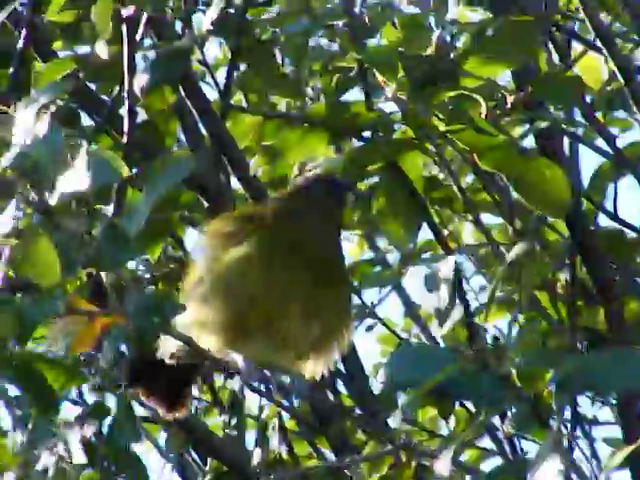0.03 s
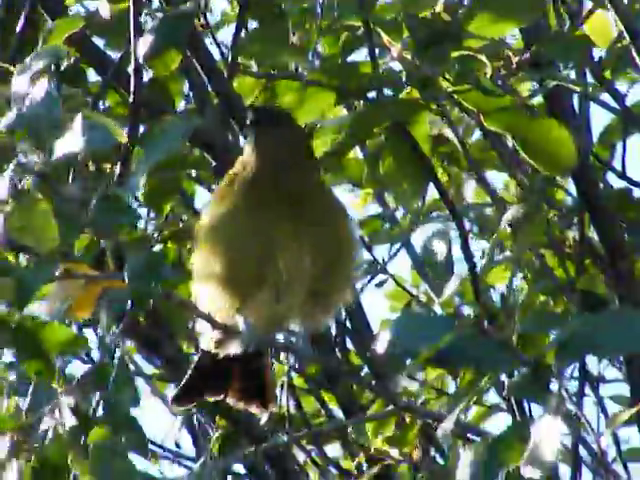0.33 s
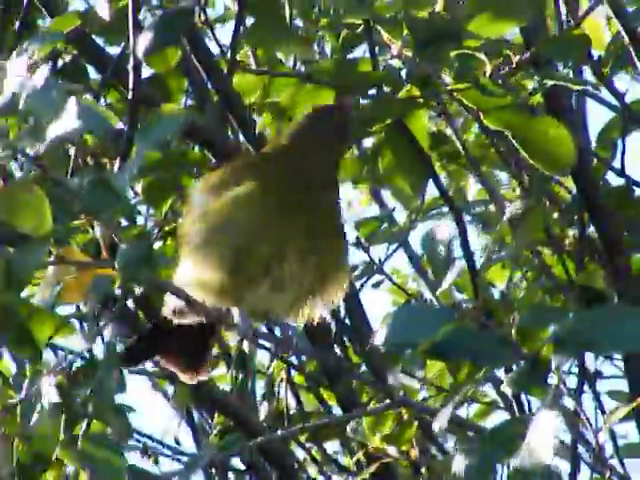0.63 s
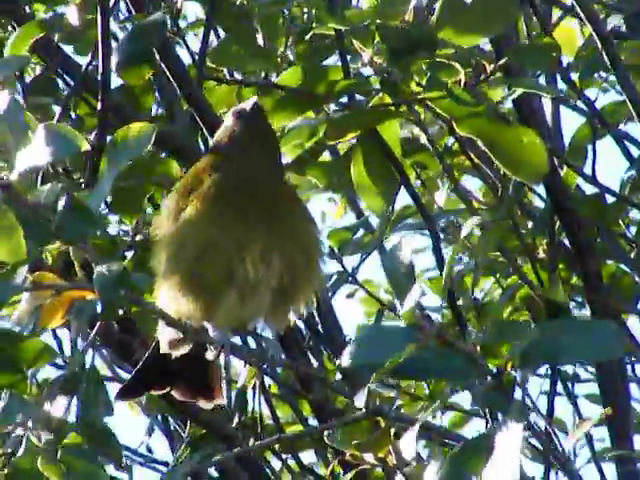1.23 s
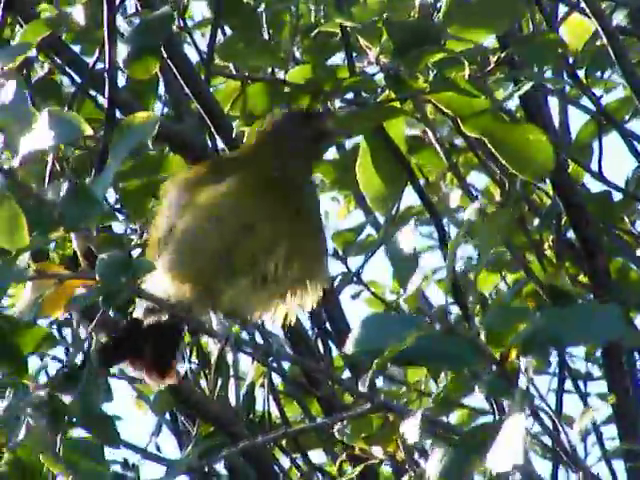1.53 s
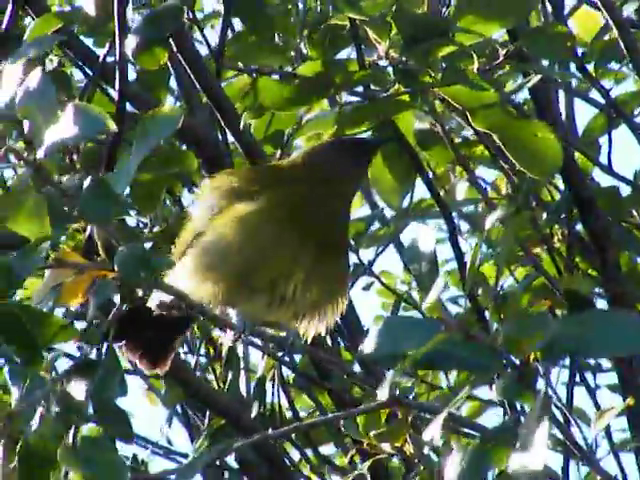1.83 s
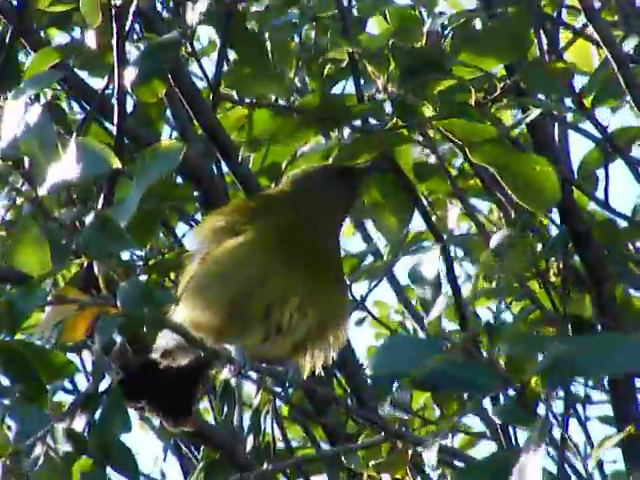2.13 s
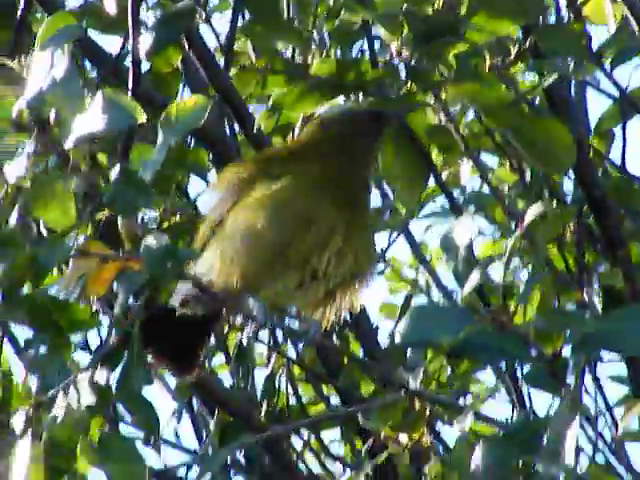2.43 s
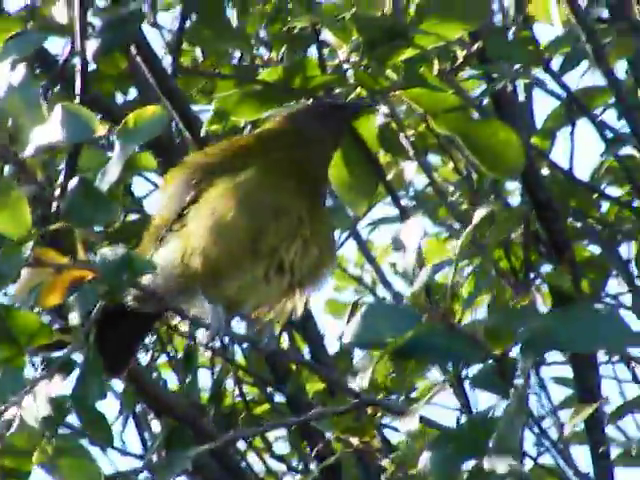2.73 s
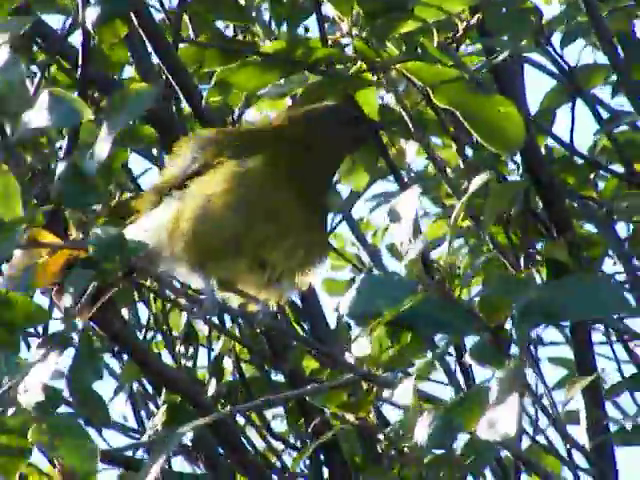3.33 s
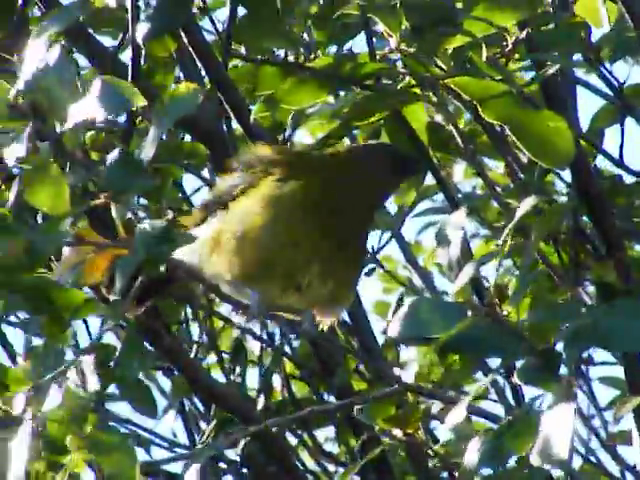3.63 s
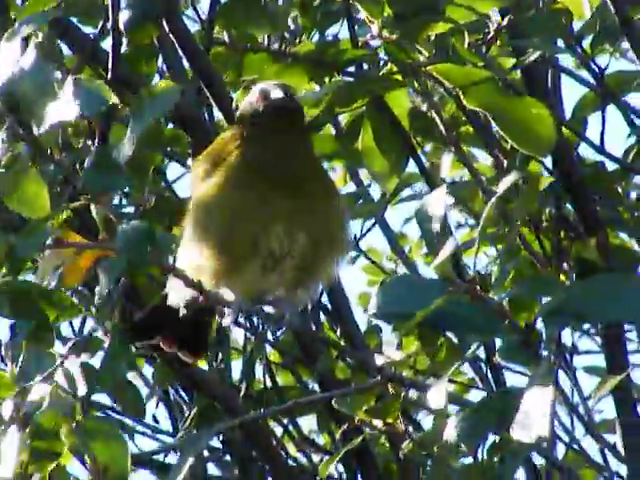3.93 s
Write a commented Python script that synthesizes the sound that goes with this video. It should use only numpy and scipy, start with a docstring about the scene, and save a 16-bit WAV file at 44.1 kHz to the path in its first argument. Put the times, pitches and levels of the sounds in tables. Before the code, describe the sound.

Close to the microphone, a songbird sings sparse notes among trees: a soft hoot, two brief rasps and dry clicks, ending with two loud downward whistles. A faint low rumble and distant hum continue underneath.

```python
"""A songbird sings close by in a leafy tree, over a faint outdoor rumble and hum. It opens with the faint
fading ring of an earlier note near 1650 Hz, one soft gliding hoot and dry clicks, probably of the bill.
Near 0.9 s and 1.8 s the two sides of its syrinx beat in harsh notes, each trailed by a hoot; clicks follow
at 1.1 s and 2.8 s. After a faint glide, two loud whistles fall at 3.3 s and 3.7 s, just clipping, each
trailed by a hoot. Throughout, trunks and leaves scatter the song, and all is dull above 6 kHz."""
import sys
import numpy as np
from scipy import signal
from scipy.fft import rfft, irfft
from scipy.io import wavfile
from scipy.ndimage import uniform_filter1d, minimum_filter1d

SR = 44100
rng = np.random.default_rng(int(sys.argv[2]) if len(sys.argv) > 2 else 0)


def output_pcm(signal):
    """Save a mono or channel-first signal as 16-bit PCM at the path in sys.argv[1].

    Samples are clipped to [-1, 1] before scaling.
    """
    pcm = np.clip(np.atleast_2d(signal).T, -1, 1) * 32767
    wavfile.write(sys.argv[1], SR, np.round(pcm).astype(np.int16))


N = 176400

# falling whistles (start [s], length [s], attack [s], mid-fall [s], fall time constant [s], level [dB])
WHISTLE_NOTES = [(3.302, 0.0926, 0.052, 3.347, 0.01143, -2.5), (3.732, 0.075, 0.028, 3.766, .0090, -3)]
# harsh notes (start [s], length [s], attack [s], low voice [Hz], high voice [Hz], level [dB])
RASP_NOTES = [(0.866, 0.081, 0.03, 1349, 1647, 2), (1.826, .082, 0.043, 1326, 1618, 2.5)]
# combination tones of the syrinx (multiple of low voice [-], multiple of high voice [-])
COMBINATION_ORDERS = [(1, 0), (0, 1), (-1, 2), (3, -1), (2, 0), (1, 1), (0, 2), (-1, 3), (4, -1), (3, 0),
                      (2, 1), (1, 2), (0, 3), (-1, 4), (3, 1)]
# strengths of those tones, a row per harsh note and a column per tone (relative level [dB])
COMBINATION_DB = [(-39, -30.5, -33, -36.5, -32.5, -22.5, -30.5, -41, -38.5, -28, -36, -33.5, -33.5, -34.5, -58),
                  (-38, -36.5, -34.5, -36, -38.5, -26, -24.5, -31, -47, -32.5, -29.5, -35.5, -37, -33, -66)]
# breath spectrum of the harsh notes (frequency [Hz], relative level [dB])
BREATH_SPECTRUM = [(900, -38), (1300, -13.5), (2000, -6.5), (2370, -11.5), (2800, -13), (3200, 3.5),
                   (3700, 1.5), (4200, 6), (4700, -4), (5300, -4.5), (6000, -9)]
# soft glides: first an earlier note's fading ring, then low hoots and one high glide (start [s],
# length [s], first pitch [Hz], final pitch [Hz], settling time [s], level [dB], roughness [share of pitch])
SOFT_GLIDES = [(.005, 0.16, 1704, 1602, 0.063, -42.5, 0.046), (0.073, 0.18, 1020, 901, 0.028, -27, 0.0048),
               (0.916, 0.082, 956, 761, .03, -38, .05), (1.888, 0.056, 950, 807, 0.024, -33.5, 0.044),
               (3.181, 0.16, 4710, 1790, .065, -40.5, 0.034), (3.385, 0.1, 994, 902, 0.032, -29, .007),
               (3.799, 0.1, 900, 746, 0.028, -37.5, .04)]
# dry clicks (time [s], level [dB], resonance [Hz], width [Hz], relative knock [dB], relative ring [dB])
BILL_CLICKS = [(0.0708, -19, 1750, 450, -20.5, -10), (.079, -29, 1750, 450, -25.5, 0),
               (1.114, -41, 4300, 1500, -25, -22), (1.122, -12, 3420, 900, -1, -36),
               (1.126, -19, 2020, 700, 0, -34), (2.784, -30, 3600, 1800, -11, -34),
               (2.7871, -17, 3360, 1380, 0.5, -38.5), (2.791, -21, 2030, 1200, -8, -31)]
# reflections from ground and trunks (delay [s], gain [dB])
REFLECTIONS = [(.0125, -18.5), (0.025, -19), (0.0491, -12.5), (.066, -22.5), (.097, -22), (.175, -31.5)]
# spectrum of the outdoor air (frequency [Hz], relative level [dB])
AIR_SPECTRUM = [(13, -30.5), (22, -1), (40, -4), (60, -6), (100, -8.5), (160, -8), (260, -10.5), (380, -10),
                (550, -14.5), (880, -15.5), (1230, -23.5), (2000, -23.5), (3400, -27.5), (5500, -32.5),
                (7000, -63.5)]
# slow swell of the outdoor air (time [s], relative level [dB])
AIR_SWELL = [(0, 1), (1, -.5), (2, -1), (2.8, -1), (3.2, 1.5), (4, -0.5)]
# spectrum of the low buffeting (frequency [Hz], relative level [dB])
BUFFET_SPECTRUM = [(15, -0.5), (40, 0), (80, 4), (160, -23.5), (600, -69)]
# course of the low buffeting (time [s], level [dB])
BUFFET_LEVELS = [(0, -56), (.9, -52.5), (1.3, -41), (1.9, -49.5), (2.6, -56), (3.2, -40), (3.6, -41),
                 (4, -36)]
# tones of the distant hum (frequency [Hz], first level [dB], last level [dB])
HUM_TONES = [(75.6, -50, -41), (118.9, -46, -44), (301, -54.5, -48)]

WHISTLE_TOP_HZ, WHISTLE_END_HZ, WHISTLE_RELEASE_S, WHISTLE_JITTER = 2378, 1502, .018, .005
LOW_END_DB, OVERTONE_DB, OVERTONE_FLUTTER = -15, -32.5, .91
RASP_RELEASE_S, RASP_ARCH, RASP_JITTER, RASP_FLUTTER, BREATH_DB = .032, .011, .0058, .17, -20.5
THROAT_LAG_S_PER_HZ = 4e-7  # higher tones leave the throat a little later
GLIDE_ATTACK_SHARE, GLIDE_RELEASE_S = .37, .028
CLICK_TIME_SCALE_S, KNOCK_HZ, BILL_RING_HZ = .0012, 342, 5000
NEAR_DB, NEAR_T60_S, WOOD_DB, WOOD_T60_S = -12.5, .08, -14.5, .48
SHEEN_HZ, SHEEN_WIDTH_HZ, SHEEN_DB = 4870, 720, -.5
RASP_WET_DB, WHISTLE_WET_DB, GLIDE_WET_DB, CLICK_WET_DB = -1.5, 0, -3, -17.5  # gains into the scattering
AIR_DB, AIR_DRIFT_DB, AIR_DRIFT_HZ = -37, .5, 1.5
BAND_HZ, BAND_STOP_HZ, TOP_HZ = 5740, 6280, 15800
LIMIT_LEVEL, LIMIT_SAMPLES, CLIP_LEVEL = .81, 221, .715


def undb(db):
    """Amplitude ratio: a factor of ten per 20 dB."""
    return 10 ** (np.asarray(db) / 20)


def unit(x):
    """Normalisation to rms 1."""
    return x / np.sqrt(np.mean(x ** 2) + 1e-20)


def drift(rate_hz):
    """Low-pass filtering of white noise gives a smooth random drift of rms 1."""
    lowpass = np.exp(-.5 * (np.fft.rfftfreq(N, 1 / SR) / rate_hz) ** 2)
    return unit(irfft(rfft(rng.standard_normal(N)) * lowpass, N))


def noise(spectrum):
    """Spectral shaping of white noise gives coloured noise of rms 1."""
    hz, db = np.array(spectrum).T
    f = np.fft.rfftfreq(N, 1 / SR) + 1
    gain = undb(np.interp(np.log(f), np.log(hz), db))
    return unit(irfft(rfft(rng.standard_normal(N)) * gain, N))


def resonate(x, hz, width_hz):
    """Forced response of a damped resonator."""
    return signal.lfilter(*signal.iirpeak(hz, hz / width_hz, fs=SR), x)


def envelope(age, length, attack, release):
    """Amplitude envelope with sine-squared attack and release."""
    rise = np.sin(np.pi / 2 * np.clip(age / attack, 0, 1))
    fall = np.sin(np.pi / 2 * np.clip((length - age) / release, 0, 1))
    return (rise * fall) ** 2


def phase_of(hz):
    """Phase is the time integral of angular frequency."""
    return 2 * np.pi * np.cumsum(hz) / SR


def whistles(t):
    """Frequency modulation: a nearly pure tone slides down an S-curve and weakens at the bottom."""
    out = np.zeros(N)
    for start, length, attack, middle, fall, db in WHISTLE_NOTES:
        fallen = .5 + .5 * np.tanh((t - middle) / fall / 2)
        hz = WHISTLE_TOP_HZ + (WHISTLE_END_HZ - WHISTLE_TOP_HZ) * fallen
        phase = phase_of(hz * (1 + WHISTLE_JITTER * drift(120)))
        overtone = undb(OVERTONE_DB) * (1 + OVERTONE_FLUTTER * drift(120)) * np.sin(2 * phase)
        shape = envelope(t - start, length, attack, WHISTLE_RELEASE_S)
        out += undb(db + LOW_END_DB * fallen ** 4) * shape * (np.sin(phase) + overtone)
    return out


def rasps(t):
    """Nonlinear coupling: two voices make sum and difference tones; air puffs out once per beat."""
    out = np.zeros(N)
    for (start, length, attack, low_hz, high_hz, db), strengths in zip(RASP_NOTES, COMBINATION_DB):
        on = (t > start) & (t < start + length)
        age = t[on] - start
        arch = RASP_ARCH * (.1 - (2 * age / length - 1) ** 2)  # pitch is highest mid-note
        low, high = (phase_of(hz * (1 + arch + RASP_JITTER * drift(90)[on])) for hz in (low_hz, high_hz))
        tones = 0
        for (m, n), tone_db in zip(COMBINATION_ORDERS, strengths):
            phase_lag = np.pi * THROAT_LAG_S_PER_HZ * (m * low_hz + n * high_hz) ** 2
            flutter = 1 + RASP_FLUTTER * drift(80)[on]
            tones += undb(tone_db) * flutter * np.cos(m * low + n * high - phase_lag)
        puffs = unit(.19 + np.sin((high - low) / 2) ** 2)
        breath = undb(BREATH_DB) * puffs * noise(BREATH_SPECTRUM)[on]
        out[on] += undb(db) * envelope(age, length, attack, RASP_RELEASE_S) * (np.sqrt(2) * tones + breath)
    return out


def soft_glides(t):
    """Exponential relaxation: soft tones sink towards a pitch, blurred by random frequency modulation."""
    out = np.zeros(N)
    for start, length, first_hz, final_hz, settle, db, roughness in SOFT_GLIDES:
        age = np.maximum(t - start, 0)
        hz = final_hz + (first_hz - final_hz) * np.exp(-age / settle)
        tone = np.sin(phase_of(hz * (1 + roughness * drift(140))))
        out += undb(db) * envelope(age, length, GLIDE_ATTACK_SHARE * length, GLIDE_RELEASE_S) * tone
    return out


def bill_clicks(t):
    """Impulsive excitation: very short cracks ring the bill's resonances, with a dull knock below."""
    out = np.zeros(N)
    for start, db, hz, width, knock_db, ring_db in BILL_CLICKS:
        scaled_age = np.maximum(t - start, 0) / CLICK_TIME_SCALE_S
        crack = rng.standard_normal(N) * np.sqrt(scaled_age) * np.exp(-2 * scaled_age)
        body = resonate(resonate(crack, hz, width), hz, 2 * width)
        knock = resonate(crack, KNOCK_HZ, width_hz=900)
        ring = resonate(crack, BILL_RING_HZ, width_hz=500)
        for part, part_db in ((body, 0), (knock, knock_db), (ring, ring_db)):
            out += undb(db + part_db) * part / np.abs(part).max()
    return out


def trees(x, t):
    """Reflection and scattering: distinct echoes, a short tail from near leaves, a longer from the wood."""
    response = np.zeros(N)
    for db, t60, onset_s in ((NEAR_DB, NEAR_T60_S, .004), (WOOD_DB, WOOD_T60_S, .03)):
        build_up = np.minimum(t / onset_s, 1) ** 2
        tail = rng.standard_normal(N) * np.exp(-np.log(1000) * t / t60) * build_up
        response += undb(db) * unit(tail) / np.sqrt(N)
    response += undb(SHEEN_DB) * resonate(response, SHEEN_HZ, SHEEN_WIDTH_HZ)  # leaves return more treble
    for delay, db in REFLECTIONS:
        response[int(delay * SR)] += undb(db)
    return signal.fftconvolve(x, response)[:N]


def background(t):
    """Slow modulation: outdoor air and low buffeting swell and fade over a wavering distant hum."""
    swell_db = np.interp(t, *np.array(AIR_SWELL).T)
    air = noise(AIR_SPECTRUM) * undb(AIR_DB + swell_db + AIR_DRIFT_DB * drift(AIR_DRIFT_HZ))
    buffet_db = np.interp(t, *np.array(BUFFET_LEVELS).T)
    buffets = noise(BUFFET_SPECTRUM) * undb(buffet_db + 2.3 * drift(5.4))
    hum = np.zeros(N)
    for hz, first_db, last_db in HUM_TONES:
        db = first_db + (last_db - first_db) * t / t[-1] + 2 * drift(2)
        hum += undb(db) * np.sqrt(2) * np.sin(phase_of(hz + 1.5 * drift(4)))
    return air + buffets + hum


def scene():
    """Superposition: the direct song, its scattered sound and the background add."""
    t = np.arange(N) / SR
    song = [(rasps(t), RASP_WET_DB), (whistles(t), WHISTLE_WET_DB),
            (soft_glides(t), GLIDE_WET_DB), (bill_clicks(t), CLICK_WET_DB)]
    direct = sum(x for x, _ in song)
    scattered = trees(sum(x * undb(db) for x, db in song), t)
    return (direct + scattered + background(t))[None]


def record(dry):
    """Band limiting and saturation: the treble is cut; a quick limiter holds peaks, which still clip."""
    f = np.fft.rfftfreq(N, 1 / SR)
    lowpass = np.clip((BAND_STOP_HZ - f) / 300, 0, 1) / np.sqrt(1 + (f / BAND_HZ) ** 70)
    dull = irfft(rfft(dry) * lowpass, N)
    gain = minimum_filter1d(LIMIT_LEVEL / np.maximum(np.abs(dull), LIMIT_LEVEL), 2 * LIMIT_SAMPLES + 1)
    gain = uniform_filter1d(uniform_filter1d(gain, LIMIT_SAMPLES), LIMIT_SAMPLES)
    clipped = np.clip(dull * gain, -CLIP_LEVEL, CLIP_LEVEL)
    return signal.sosfilt(signal.ellip(8, .1, 80, TOP_HZ, fs=SR, output="sos"), clipped)


dry = scene()
out = record(dry)
output_pcm(out)
```